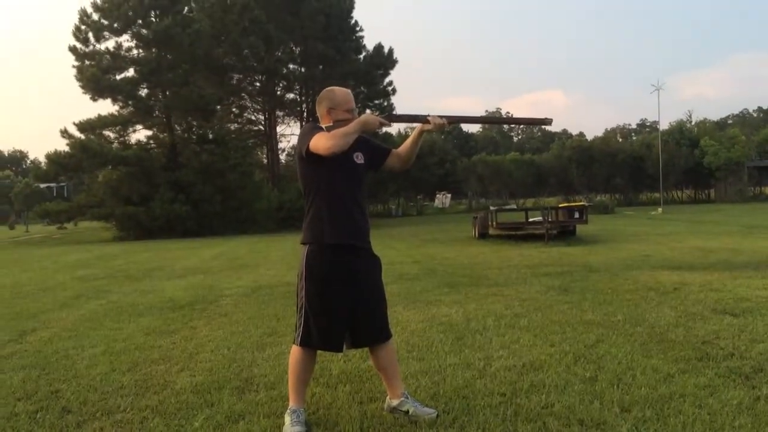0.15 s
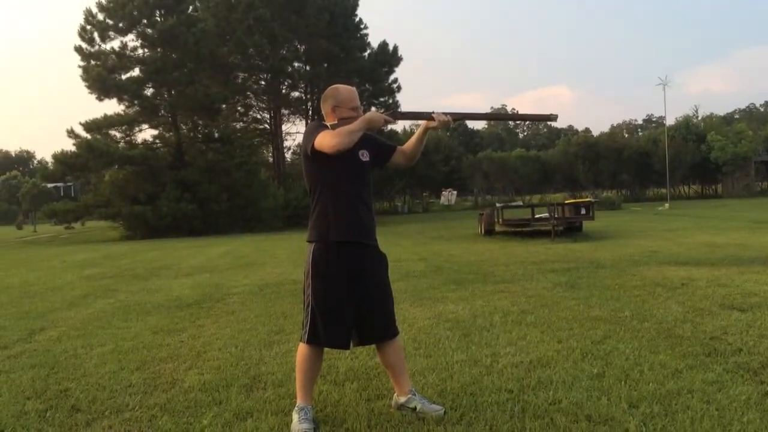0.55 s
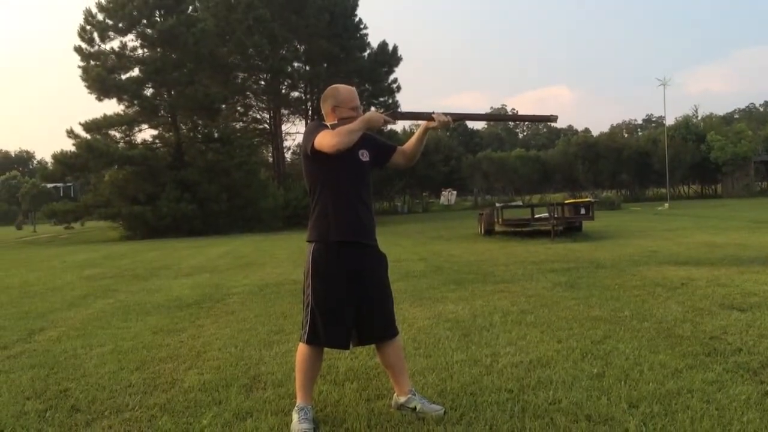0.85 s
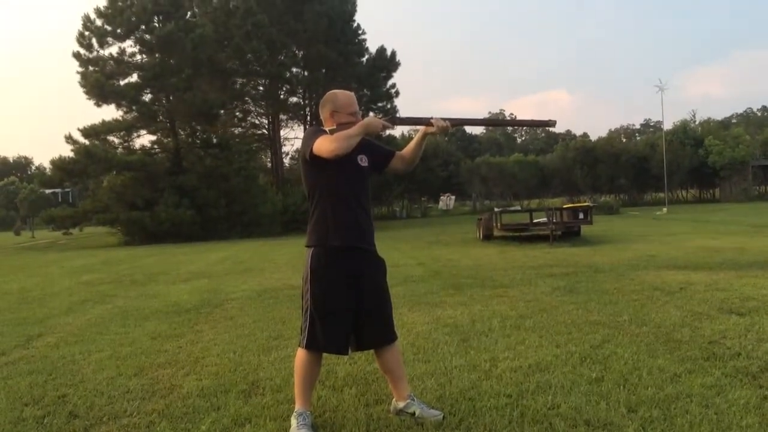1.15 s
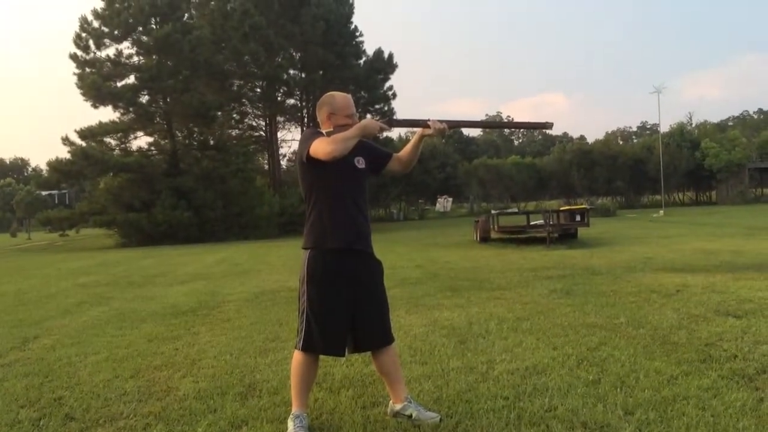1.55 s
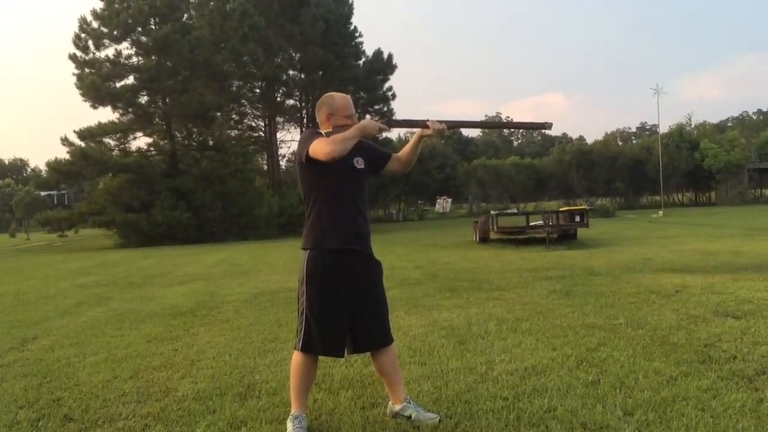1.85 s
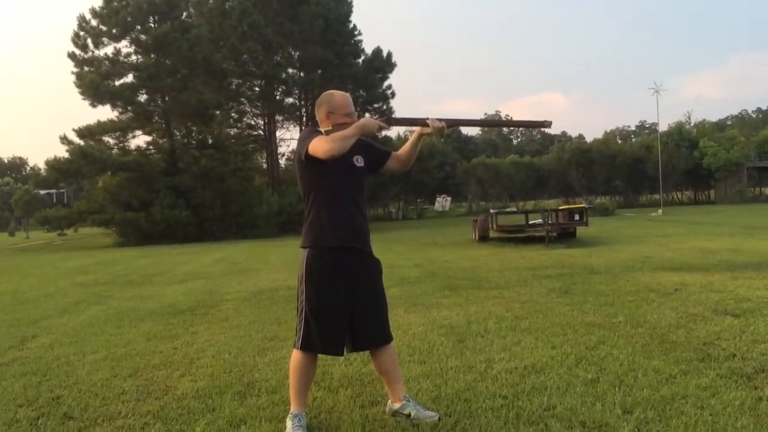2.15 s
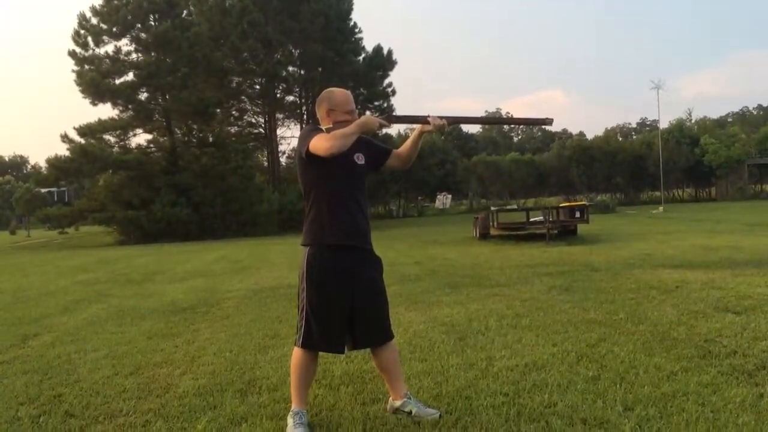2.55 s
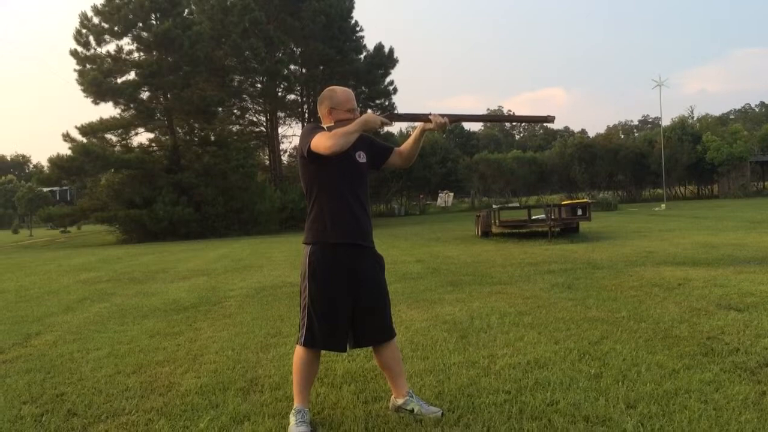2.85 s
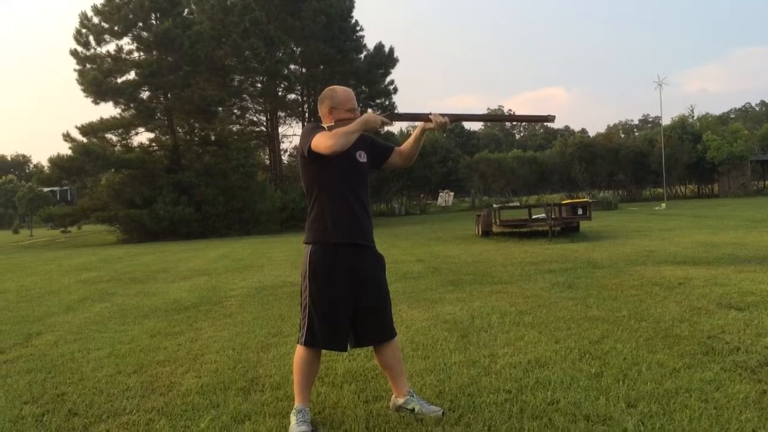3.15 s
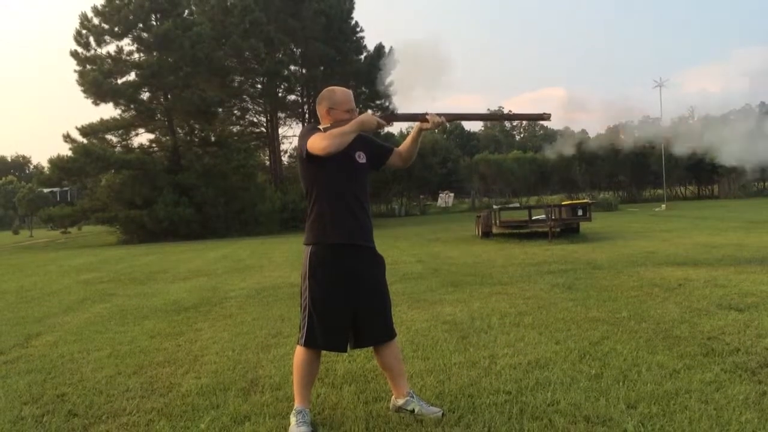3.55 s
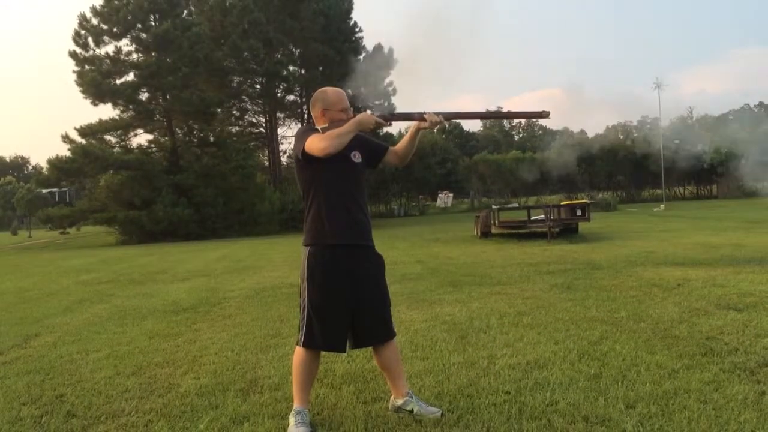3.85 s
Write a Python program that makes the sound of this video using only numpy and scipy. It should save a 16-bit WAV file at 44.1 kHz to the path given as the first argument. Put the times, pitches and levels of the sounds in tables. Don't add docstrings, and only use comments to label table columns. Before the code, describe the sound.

A flintlock rifle shot on an open lawn: faint insects and low distant rumble first, then a sharp lock click and a very loud blast with rapid echoes, heard by a nearby microphone that limits the peak.

```python
import sys
import numpy as np
from scipy import signal
from scipy.io import wavfile
from scipy.ndimage import uniform_filter1d

SR = 44100
rng = np.random.default_rng(int(sys.argv[2]) if len(sys.argv) > 2 else 0)


def gain_from_decibels(decibels):
    exponent = np.asarray(decibels, float) / 20
    return 10 ** exponent


def int16_out(signal):
    q = np.round(np.clip(np.atleast_2d(signal).T, -1, 1) * 32767)
    wavfile.write(sys.argv[1], SR, q.astype(np.int16))


N = 176400


def evened(x):
    return x / np.sqrt(np.mean(x ** 2) + 1e-20)


def read(points, hz):
    f, value = np.transpose(points)
    return np.interp(np.log(hz + 1), np.log(f + 1), value)


def add(mix, s, sound):
    part = mix[round(s * SR):][:len(sound)]
    part += sound[:len(part)]


def resonate(x, hz, width):
    turn = np.exp(2j * np.pi * hz * np.arange(len(x)) / SR)
    r = np.exp(-np.pi * abs(width) / SR)
    return 2 * (turn * signal.lfilter([1 - r], [1, -r], x / turn + 1e-18)).real


def body(x, peaks):
    out = 0
    for k, (hz, width, db) in enumerate(peaks):
        out = out + (-1) ** k * gain_from_decibels(db) * resonate(resonate(x, hz, width), hz, width)
    return out


def noise(shape, patchy_db, count=N, size=1024, t60=None, hold=0.):
    hop = size // 4
    frames, hz = count // hop + 5, np.fft.rfftfreq(size, 1 / SR)
    a, b, p = rng.standard_normal((frames, len(hz), 3)).T
    patches = uniform_filter1d(uniform_filter1d(p, size=10, axis=0), size=6, axis=1)
    z = (a + 1j * b) * gain_from_decibels(read(shape, hz)[:, None] + patchy_db * evened(patches))
    x = signal.istft(z, nperseg=size, noverlap=size - hop)[1]
    scale = np.std(x)
    if t60:
        age = np.maximum(np.arange(frames) * hop / SR - hold, 0)
        z = z * gain_from_decibels(-60 * age / read(t60, hz)[:, None])
        x = signal.istft(z, nperseg=size, noverlap=size - hop)[1]
    return x[:count] / scale


# (f/Hz, level/dB per Hz)
AIR = [(15, -34), (25, -16.5), (108, 0.5), (157, -9.5), (206, -9), (259, -16.5), (366, -22.5), (894, -33),
       (2200, -33.5), (5500, -40.5), (7800, -49), (13200, -120)]
# (f/Hz, level/dB per Hz)
CHORUS = [(3470, -60), (5900, -26), (6820, -1), (7890, 3), (9020, -12), (9750, -4), (10400, -3.5),
          (10900, -15.5), (11400, -62), (15000, -70), (22000, -120)]


def lawn():
    t = np.arange(N) / SR
    throb = evened(sum(np.sin(2 * np.pi * (f * t + rng.random())) for f in np.geomspace(15, 300, 30)))
    hiss = [(4450, -40), (8900, 0), (11000, -14), (11400, -34), (12300, -32), (12800, -3),
            (15300, 0), (15450, -50)]
    return (gain_from_decibels(-58.5) * noise(AIR, patchy_db=0.0, size=2048)
            + gain_from_decibels(-83.5) * noise(hiss, patchy_db=-2.0)
            + gain_from_decibels(-61 + 0.84 * throb) * noise(CHORUS, patchy_db=0.1, size=512))


# (t/s, wing beat f/Hz, level/dB, nearness 0-1)
FLIGHT = [(0.0, 222, -67, 0.3), (.3, 222, -73, 0.3), (.4, 221, -75, 0.1), (.49, 220, -67, 0.2),
          (.62, 225.5, -73, 0.4), (.732, 223.6, -66, 0.8), (.79, 220, -70, 0.9), (.844, 216.7, -69, 1),
          (.865, 218.2, -75, 1), (.9, 219.2, -69, 1), (.966, 214.2, -78.5, 1), (1.028, 215.9, -77, 1),
          (1.12, 218.6, -83, 1), (1.15, 215.1, -77.5, 1), (1.254, 217.5, -79, 1), (1.284, 218.5, -84, 1),
          (1.314, 216.3, -77, 1), (1.45, 210, -74, .6)]
# (f/Hz, width/Hz, level/dB)
INSECT_BODY = [(3606, 520, -0.5), (4290, 270, 4.5), (5030, 490, -2.5)]


def buzzer():
    wobble, fade_db_per_s = 0.00587, 30
    s, rate, db, near = np.transpose(FLIGHT)
    t = np.arange(N) / SR
    near = np.interp(t, s, near)
    ragged = np.interp(t, [.7, .92, .97, 1.3, 1.4], [.85, .7, .3, .35, .85])
    drift = evened(uniform_filter1d(uniform_filter1d(rng.standard_normal(N), size=500), size=500))
    turns = np.cumsum(np.interp(t, s, rate) * (1 + 2 * wobble * ragged * drift)) / SR
    clicks = sum(np.cos(2 * np.pi * k * turns) for k in range(12, 27))
    drive = (1 - ragged) * evened(clicks) + .6 * ragged * rng.standard_normal(N)
    voice = body(drive, INSECT_BODY[:1]) - (.05 + 0.8 * near) * body(drive, INSECT_BODY[1:])
    level_db = np.interp(t, s, db) - fade_db_per_s * np.maximum(t - s[-1], 0) + 4.0
    return gain_from_decibels(level_db) * voice / np.std(voice[SR:SR + 12000])


def chirp(db, hz, length):
    rasp_hz, width_hz = 345, 740
    z, n = rng.standard_normal((2, 4000)), min(int(length * SR), 4000)
    turns = np.cumsum(rasp_hz * (1 + .5 * uniform_filter1d(z[0], size=200))) / SR
    scrapes = evened(np.diff(np.floor(turns), prepend=0)) + 1.2 * z[1]
    ringing = resonate(resonate(scrapes, hz, width_hz), hz, 1.9 * width_hz)
    return gain_from_decibels(db) * evened(ringing)[:n] * np.hanning(n) ** 1.04


# (t/s, level/dB, f/Hz, length/s)
CHIRPS = [(0.2594, -55, 2370, 0.044), (0.263, -56, 3250, 0.038), (0.261, -59, 1500, 0.039),
          (0.685, -57.5, 2800, 0.039), (1.542, -52, 2940, 0.036), (2.165, -59.5, 2700, 0.033),
          (2.474, -55, 2420, 0.035), (2.499, -61, 2800, 0.037), (2.718, -51, 2680, .012),
          (2.847, -49.5, 2820, 0.027), (2.844, -59, 3800, .025), (2.848, -55, 1600, 0.028),
          (3.21, -69, 2520, 0.029), (3.306, -55.5, 2870, 0.037), (3.31, -59, 2010, 0.041)]


def chirps():
    out = np.zeros(N)
    for s, db, hz, length in CHIRPS:
        add(out, s - 0.34 * length, chirp(db - 15.5, hz, 1.34 * length))
    return out


def ping():
    hz, t60_s = 1055, 0.17
    out, t = np.zeros(N), np.arange(9000) / SR
    ring = gain_from_decibels(-53 - 60 * t / t60_s) * np.sin(2 * np.pi * hz * t)
    tick = gain_from_decibels(-57) * resonate(1. * (t == 0), 1500, 2500)
    add(out, 2.718, ring + tick)
    return out


# (t/s, level/dB, share of wood/dB, time to fall 60 dB/s)
CONTACTS = [
    (3.461, -55, 0, 0.018),
    (3.4732, -16.5, -13, 0.0091),
    (3.4757, -28.5, 7, 0.029),
    (3.478, -18, -15, 0.0053),
    (3.4812, -20, 6.5, 0.02),
    (3.4827, -15, 4.5, 0.027),
    (3.4852, -21, 4, 0.025),
    (3.55, -42, -2, .02),
    (3.5575, -42.5, 10.5, 0.035),
    (3.5625, -41, 9, 0.024),
]
# (f/Hz, width/Hz, level/dB)
STEEL = [(3890, 570, 1), (6820, 1860, -1), (9300, 1200, -1), (10740, 1400, 0.5), (14000, 2100, -1)]
# (f/Hz, width/Hz, level/dB)
STOCK = [(505, 88, -12), (860, 225, -9.5), (1167, 330, -6), (2054, 230, 2.5), (2630, 530, -4)]


def lock():
    out, t = np.zeros(N), np.arange(4000) / SR
    for s, db, wood_db, t60 in CONTACTS:
        z = rng.standard_normal((2, 4000))
        sound = evened(body(z[0], STEEL)) + gain_from_decibels(wood_db) * evened(body(z[1], STOCK))
        add(out, s, gain_from_decibels(db - 60 * t / t60) * np.minimum(t / .0004, 1) * sound)
    low_cut = signal.butter(3, 420, 'high', fs=SR, output='sos')
    return signal.sosfilt(low_cut, out)


# (f/Hz, level/dB per Hz)
FIZZ = [(120, -16), (200, -5.5), (1390, -4.5), (1550, -1.5), (5470, -18), (9500, -10.5), (15600, -20)]


def pan():
    out, t = np.zeros(N), np.arange(6000) / SR
    level = gain_from_decibels(-46.5 + 9.7 * np.exp(-t / 0.0059)) * np.minimum(t / 0.0016, 1)
    add(out, 3.474, level * noise(FIZZ, patchy_db=2.5, count=6000, size=256))
    return out


# (t/s,
# level/dB, f/Hz, cycles, start of the swing/turns)
SLAPS = [(3.532, -39.5, 100, 1.3, -0.025), (3.5645, -23, 300, 0.55, -0.065), (3.585, -26, 62, 1.8, 0.061),
         (3.59, -22.5, 108, 2.5, 0.49), (3.596, -23, 350, 4, -0.085), (3.617, -25, 620, 5.5, 0),
         (3.664, -25.5, 365, 4.4, 0.015), (3.725, -21, 167.4, 4.5, -0.06), (3.955, -24.5, 174, 3.7, 0.061),
         (3.6525, -22, 398, 2, -0.044), (3.6727, -21.5, 400, 2.1, -0.034), (3.6988, -5, 570, 1.08, -.1),
         (3.7106, -15, 418, 1.8, 0.0094), (3.72, -11.5, 688, 3.7, 0.41), (3.732, -12.5, 322, 1.74, 0.022),
         (3.74, -21, 350, 2.1, 0.12), (3.7575, -26, 400, 1.5, -0.097), (3.7865, -19, 430, 1.44, -0.059),
         (3.857, -24.5, 407, 1.2, 0), (3.903, -25.5, 395, 1.65, -0.17), (3.931, -26.5, 251, 0.78, 0),
         (3.95, -19, 217, 1.16, 0.05), (3.963, -16.5, 338, 5.6, 0.2), (3.983, -19.5, 310, 2.1, 0.09),
         (3.9905, -14.5, 304, 1.2, -0.15)]


def slaps():
    out, u = np.zeros(N), np.arange(-1600, 1600) / SR
    for s, db, hz, cycles, turn in SLAPS:
        swell = np.exp(-(2.37 * u * hz / cycles) ** 2)
        pulse, suction = swell * np.cos(2 * np.pi * (hz * u - turn)), swell ** .15
        add(out, s + u[0], gain_from_decibels(db) * (pulse - suction * pulse.sum() / suction.sum()))
    return out


def puff(db, hz, width, length):
    z = rng.standard_normal((2, 4000))
    n = min(int(2 * length * SR), 4000)
    crackle = z[0] * gain_from_decibels(3.9 * z[1])
    x = resonate(resonate(crackle, hz, width), hz, 2.1 * width)
    return gain_from_decibels(db) * evened(x)[:n] * np.hanning(n)


# (centre
# t/s, level/dB, f/Hz, width/Hz, length/s)
CRACKS = [(3.856, -35.5, 9300, 3600, .005), (3.857, -32, 2600, 830, .004), (3.873, -33, 2850, 1000, .004),
          (3.9565, -26, 1500, 750, 0.0037), (3.786, -32, 2200, 2300, .003),
          (3.657, -26, 7300, 5000, 0.0028), (3.5738, -16, 8100, 4000, .001),
          (3.564, -44, 2900, 250, 0.0068), (3.7325, -21, 3160, 730, .003),
          (3.5737, -14, 9400, 3300, 0.0044), (3.588, -22, 1600, 1600, 0.0061),
          (3.6092, -16, 2140, 900, 0.00202), (3.66, -23.5, 2400, 1500, 0.014),
          (3.668, -18.5, 2680, 1700, 0.0038), (3.6675, -23.5, 9100, 4000, 0.0018),
          (3.6985, -20.5, 4700, 4800, .002), (3.7153, -29, 1900, 850, 0.0035),
          (3.719, -26, 2060, 900, 0.0043), (3.731, -22.5, 3300, 6100, 0.0023),
          (3.754, -33, 5900, 600, 0.0038), (3.769, -28, 1600, 1200, 0.00298),
          (3.79, -33.5, 2400, 2900, 0.012), (3.863, -36.5, 2410, 2800, .02),
          (3.893, -31, 1950, 2500, 0.022), (3.959, -28.5, 1900, 1650, 0.029),
          (3.984, -30, 1840, 1600, 0.019)]


def cracks():
    out = np.zeros(N)
    for s, db, hz, width, length in CRACKS:
        add(out, s - length, puff(db, hz, width, length))
    return out


SHOT_S = 3.5705
# (f/Hz, level/dB per Hz)
ROAR = [(24, -40), (60, -8), (250, -10.5), (600, -7.5), (983, -9.5), (2400, -6.5), (4500, -12),
        (14700, -12.5), (15800, -19.5)]
# (f/Hz, time to fall 60 dB/s)
ROAR_T60 = [(80, 0.087), (400, 0.42), (2500, 0.26), (7000, 0.21), (14000, 0.33)]
# (f/Hz, level/dB per Hz)
TAIL = [(40, -60), (150, -32), (350, -12.5), (643, -21.5), (1140, -20), (1400, -16), (2140, -19.5),
        (9820, -21), (15800, -32)]
# (f/Hz, time to fall 60 dB/s)
TAIL_T60 = [(80, 4), (400, 4.2), (2500, 5.4), (7000, 1.78), (14000, 1.24)]
# (t/s, depth level/dB, recovery/s)
DUCKS = [
    (3.699, 9, 0.03),
    (3.7215, 3, 0.01),
]


def muzzle():
    rise_s, hold_s, tail_swell_s = 0.0021, 0.025, 0.068
    out, count = np.zeros(N), N - round(SHOT_S * SR)
    t = np.arange(count) / SR
    rise = np.minimum(t / rise_s, 1) ** 0.54
    roar = gain_from_decibels(-15) * noise(ROAR, patchy_db=1.5, count=count, size=256, t60=ROAR_T60, hold=hold_s)
    tail = gain_from_decibels(-29.5) * noise(TAIL, patchy_db=1.5, count=count, size=512, t60=TAIL_T60)
    duck_db = 0
    for s, db, back in DUCKS:
        since = t + SHOT_S - s
        duck_db = duck_db + db * np.clip(1 - since / back, 0, 1) ** .7 * (since > 0)
    add(out, SHOT_S, rise * gain_from_decibels(-duck_db) * (roar + np.minimum(t / tail_swell_s, 1) * tail))
    return out


# (f/Hz, level/dB per Hz)
RUMBLE = [(40, -32), (90, -9), (160, 1), (300, -7.5), (500, -30), (900, -68)]


def rumble():
    out, count = np.zeros(N), N - round(SHOT_S * SR)
    swell = np.interp(np.arange(count) / SR + SHOT_S, [3.67, 3.76], [0, 1])
    add(out, SHOT_S, swell * gain_from_decibels(-33.5) * noise(RUMBLE, patchy_db=1.0, count=count))
    return out


def scene():
    wait = lawn() + buzzer() + chirps() + ping()
    shot = slaps() + cracks() + muzzle() + rumble()
    return (wait + lock() + pan() + shot)[None]


def top_cut(x):
    return signal.sosfilt(signal.butter(12, 16470, fs=SR, output="sos"), x)


def record(dry):
    edge = signal.firwin(1023, 15620, window=("kaiser", 9), fs=SR)[None]
    return top_cut(signal.oaconvolve(dry, edge, "same"))


dry = scene()
out = record(dry)
int16_out(out)
```